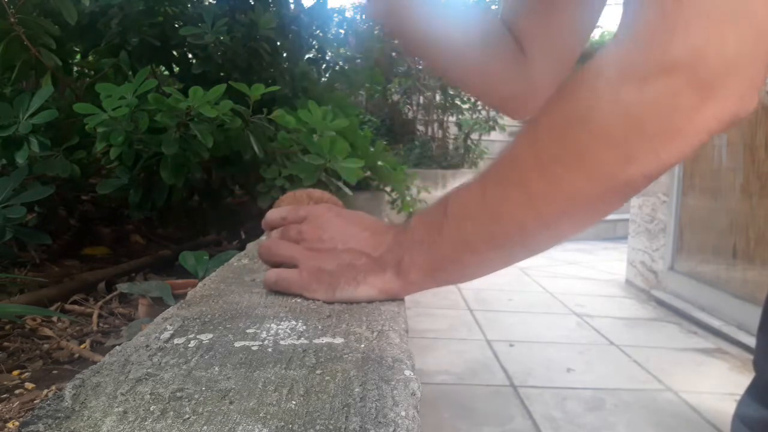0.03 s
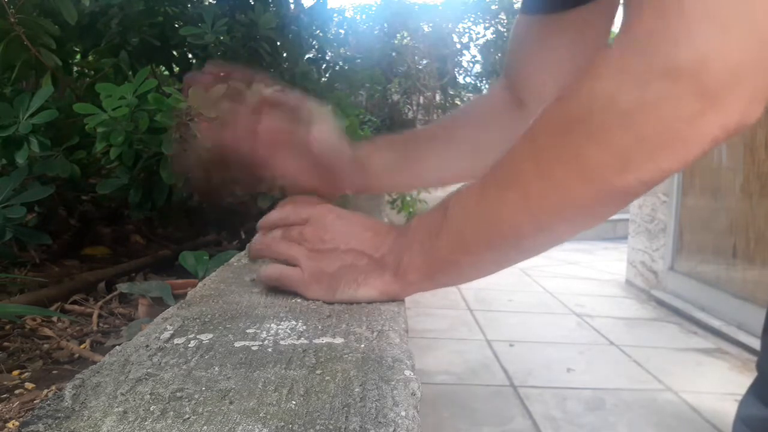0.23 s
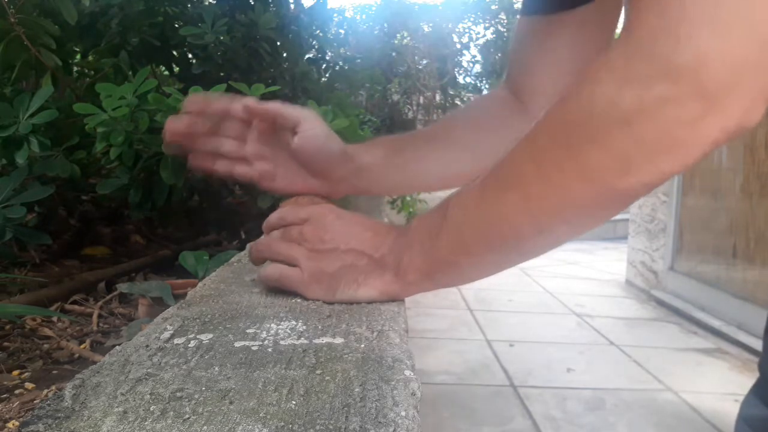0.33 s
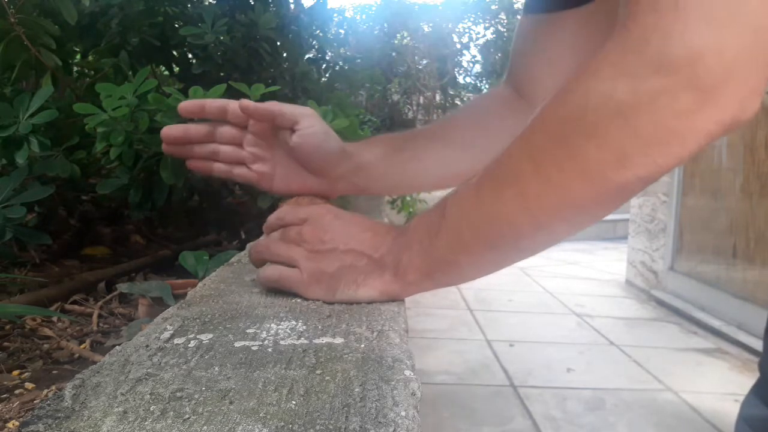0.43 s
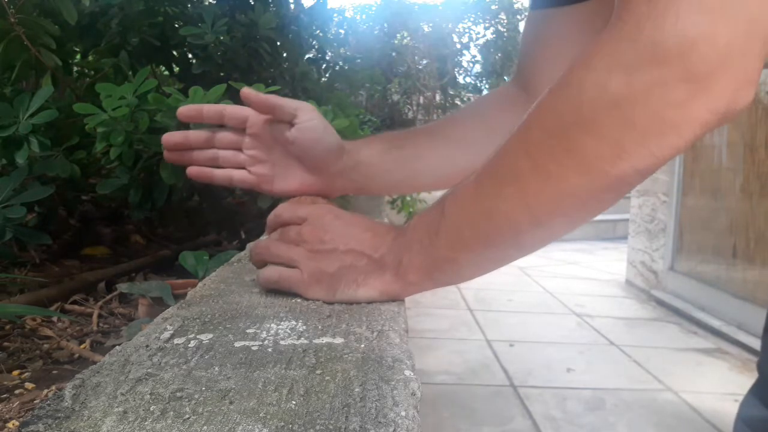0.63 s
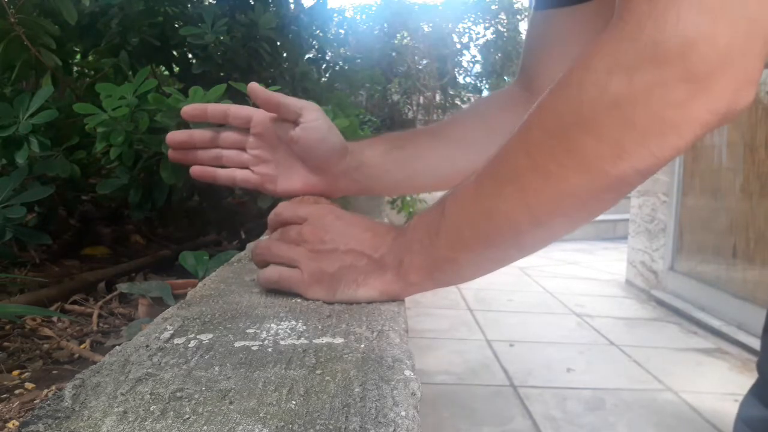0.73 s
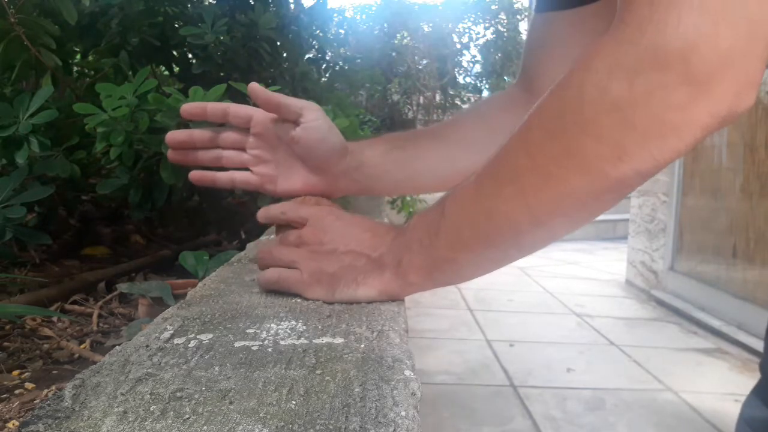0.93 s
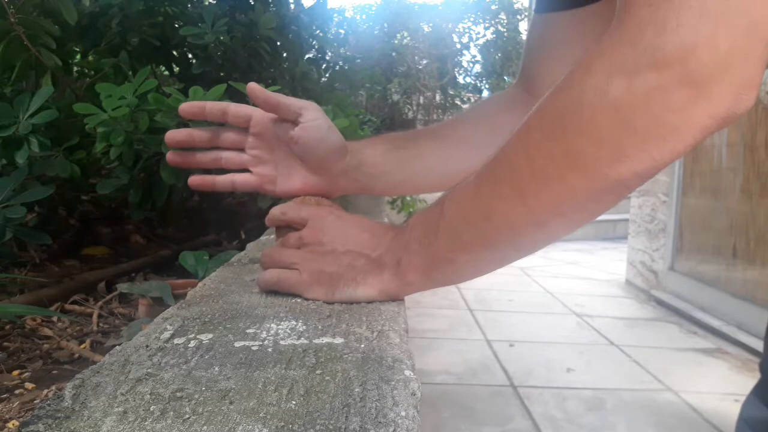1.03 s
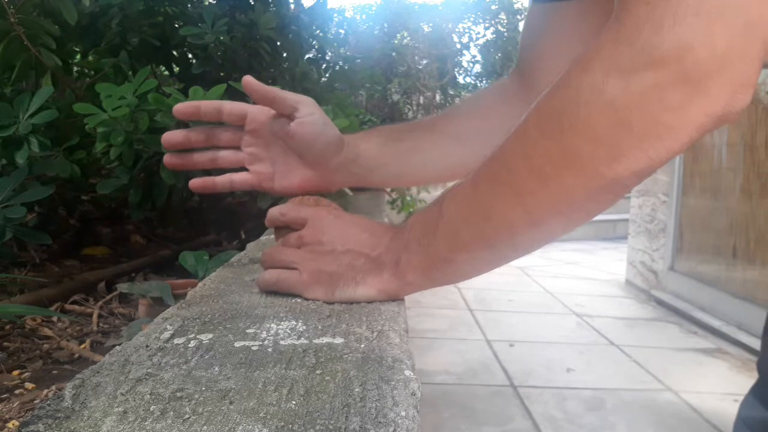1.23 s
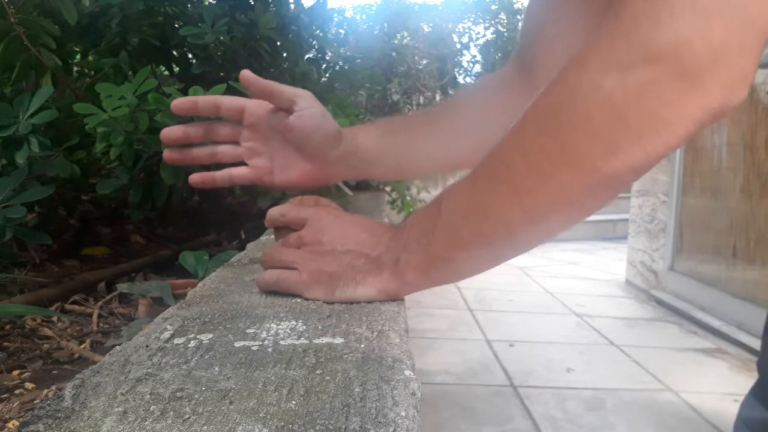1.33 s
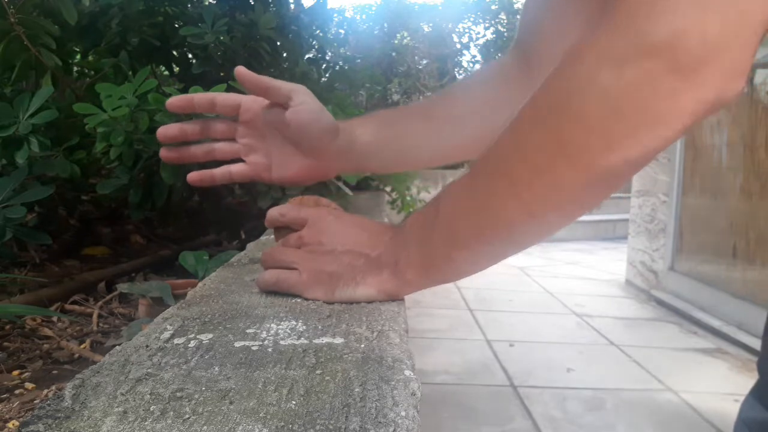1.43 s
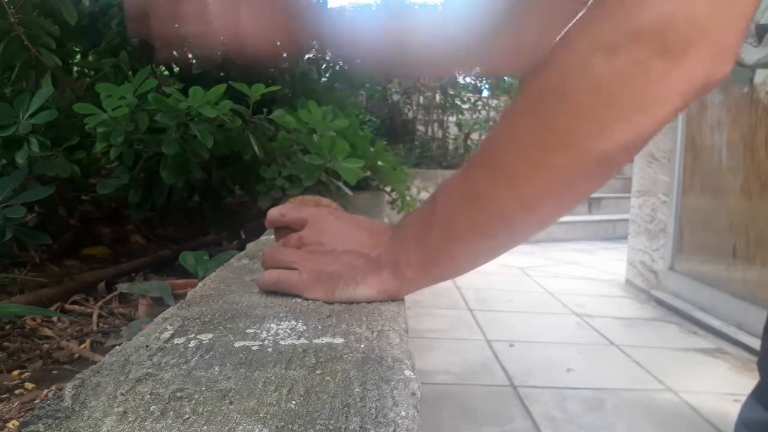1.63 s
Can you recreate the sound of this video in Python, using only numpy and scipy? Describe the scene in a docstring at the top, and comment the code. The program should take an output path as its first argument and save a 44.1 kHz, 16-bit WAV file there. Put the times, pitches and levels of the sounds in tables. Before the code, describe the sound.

One loud hand smack on a stone outdoors, with a short echo, then quiet.

```python
"""A quiet outdoor rumble and hiss come first; then a hand chops once on a stone on a ledge, close by.
A light touch and a sharp crack sound as it lands, and the air pushed by the palm gives a low thud.
The tiles and walls of the yard throw the blow back as a dense clatter, coloured by brief steady tones.
The recorder's gain control turns the sound down for a second, then lets the background swell back,
and a distant hum comes in."""
import sys
import numpy as np
from scipy import signal
from scipy.fft import rfft, irfft
from scipy.io import wavfile
from scipy.ndimage import minimum_filter1d

SR = 44100
rng = np.random.default_rng(int(sys.argv[2]) if len(sys.argv) > 2 else 0)


def dump(signal):
    """Clip the signal to [-1, 1] and save it as 16-bit WAV at the path in sys.argv[1]."""
    limited = np.clip(np.atleast_2d(signal).T, -1, 1)
    pcm = np.round(limited * 32767).astype(np.int16)
    wavfile.write(sys.argv[1], SR, pcm)


N = 74970
T = np.arange(N) / SR
HZ = np.fft.rfftfreq(N, 1 / SR)

# tone colour of the outdoor air: f/Hz, relative level/dB
AIR_COLOUR = [(25, -33), (60, -11.5), (120, -5.5), (200, -3.5), (280, -7), (400, -15), (560, -15),
              (750, -18), (1100, -21), (1650, -26), (2300, -29), (3500, -34.5), (4500, -27), (5300, -31),
              (6200, -38.5), (8600, -41.5), (10000, -56), (15500, -51)]
# faint ticks: t/s, level/dB
FAINT_TICKS = [(0.928, -52), (0.952, -48), (1.1095, -52), (1.218, -44)]
# faint, fine rustles: t/s, level/dB
FAINT_RUSTLES = [(0.04, -68), (0.68, -63), (1.64, -68.5)]
# tone colour of the reflections: f/Hz, relative level/dB
YARD_COLOUR = [(35, -54), (60, -25.5), (123, -7.5), (163, -15), (206, -8.5), (359, -24), (464, -7.5),
               (572, -2), (657, -7), (810, -8), (869, -8), (1120, -3), (1630, -11.5), (1790, -3),
               (2470, -2.5), (3420, -8), (4420, -2.5), (5980, -10.5), (6410, -9), (8470, -7.5),
               (10400, -20.5), (14100, -16.5), (15500, -24)]
# time the reflections take to fade by 60 dB: f/Hz, t/s
YARD_FADE_TIMES = [(100, .36), (400, .26), (1200, .27), (2300, .29), (4300, .275), (8000, .265),
                   (15000, .245)]
# tone colour of the lingering wash of reflections: f/Hz, relative level/dB
WASH_COLOUR = [(100, 2), (200, 4), (350, -1), (1100, -1.5), (1550, -6), (2300, 1.5), (3400, -6.5),
               (4400, -6.5), (7000, -19), (10000, -35), (15000, -42)]
# single strong reflections from nearby surfaces: t/s, level/dB
NEAR_REFLECTIONS = [(0.2315, 2.5), (0.2399, 1), (0.2498, 6), (0.2547, 4), (0.2581, 5)]
# brief steady tones that colour the clatter of reflections: f/Hz, relative level/dB
CLATTER_PEAKS = [(595, -3), (1849, -3), (2091, 0), (2163, 0), (2396, 1), (2540, -2), (2675, -2), (2992, -3),
                 (4009, 1), (4156, -1), (4285, -1), (4394, 0), (4521, 0), (4991, 0)]
# the light touch and the hard hit: t/s, level/dB, decay/s
HAND_CONTACTS = [(0.2162, -17.5, .0014), (0.2216, 9, .0004)]
# tone colour of a contact: f/Hz, relative level/dB
CRACK_COLOUR = [(200, -15.5), (1100, -3.5), (2500, -9), (4300, 2), (5500, -5), (8000, -1.5), (10000, -16),
                (15500, -14.5)]

YARD_START_S, CLICK_RISE_S = .2285, .0005


def amp(db):
    """Turns decibels into a gain."""
    return 10 ** (np.asarray(db) / 20)


def read(points, hz):
    """Looks up a table between its rows, on a log-frequency axis."""
    f, value = np.transpose(points)
    return np.interp(np.log(hz + 1), np.log(f + 1), value)


def noise(gain):
    """Noise of average strength (rms) 1, shaped by a gain at each frequency."""
    x = irfft(gain * np.exp(2j * np.pi * rng.random(len(HZ))), N)
    return x / x.std()


def noise_band(hz, width_hz):
    """Noise that is strongest around one frequency."""
    return noise(1 / (1 + ((HZ - hz) / width_hz) ** 2))


def since(start):
    """Seconds since the start, zero before it."""
    return np.maximum(T - start, 0)


def ramp(start, rise_s):
    """Climbs straight from 0 to 1 and stays there."""
    return np.minimum(since(start) / rise_s, 1)


def burst(start, rise_s, decay_s):
    """A loudness shape that climbs straight up, then dies away."""
    return ramp(start, rise_s) * np.exp(-since(start + rise_s) / decay_s)


def background():
    """Outdoor rumble, a thin hiss like far insects, a wavering distant hum, faint ticks and rustles."""
    low_cut = HZ ** 2 / np.hypot(HZ ** 2, 38 ** 2)  # weakens the rumble below 38 Hz
    air = amp(-41) * noise(amp(read(AIR_COLOUR, HZ)) * low_cut)
    hiss = amp(-62) * noise_band(hz=4490, width_hz=200)
    hum_hz = 550.2 + 4.125 * noise_band(hz=0, width_hz=7.3)  # the pitch wanders a little
    hum = amp(-47) * ramp(1.282, rise_s=.0354) * np.sin(2 * np.pi * np.cumsum(hum_hz) / SR)
    tick_shape = sum(amp(db) * burst(t, CLICK_RISE_S, decay_s=.001407) for t, db in FAINT_TICKS)
    ticks = tick_shape * noise_band(hz=8300, width_hz=1460)
    rustle_shape = sum(amp(db) * burst(t, rise_s=.0082, decay_s=.025) for t, db in FAINT_RUSTLES)
    rustles = rustle_shape * noise_band(hz=13030, width_hz=2460)
    return air + hiss + hum + ticks + rustles


def yard_reflections():
    """Reflections from tiles and walls pile up and fade; a few stand out, and one far echo follows."""
    swell_s, swell_db, wash_fade_s = .02743, 1.5, .82
    colour = amp(read(YARD_COLOUR, HZ))
    spectrum = rfft(noise(colour))
    age = since(YARD_START_S + swell_s)
    centres_hz = np.geomspace(60, 16000, 14)
    clatter = np.zeros(N)
    for hz, this_band_only in zip(centres_hz, np.eye(len(centres_hz))):
        band = irfft(spectrum * read(np.c_[centres_hz, this_band_only], HZ), N)
        clatter += band * amp(-60 * age / read(YARD_FADE_TIMES, hz))  # each band fades at its own pace
    swell = amp(swell_db * (ramp(YARD_START_S, swell_s) - 2))
    build_up = ramp(YARD_START_S, rise_s=.0026) * swell
    wash = amp(-13.5 - 60 * age / wash_fade_s) * noise(amp(read(WASH_COLOUR, HZ)))
    slap_shape = sum(amp(db) * burst(t, rise_s=.0004, decay_s=.0013) for t, db in NEAR_REFLECTIONS)
    slaps = slap_shape * noise(colour)
    echo = amp(-25) * burst(.464, rise_s=.006, decay_s=.015) * noise_band(hz=2080, width_hz=420)
    return build_up * (amp(5) * clatter + wash) + slaps + echo


def clatter_peaks():
    """Brief steady tones that colour the clatter of reflections and fade with it."""
    tones = sum(amp(db) * np.sin(2 * np.pi * (hz * T + rng.random())) for hz, db in CLATTER_PEAKS)
    decay_s = .26 / np.log(1000)  # fades by 60 dB in 0.26 s
    return amp(-11) * burst(YARD_START_S, rise_s=.021, decay_s=decay_s) * tones


def hand_chop():
    """The hand cracks and knocks on the stone, pushes out a puff of air and lands with its weight."""
    crack_shape = np.zeros(N)
    for t, db, decay_s in HAND_CONTACTS:
        tail = amp(-29.5) * burst(t, CLICK_RISE_S, decay_s=.011)
        crack_shape += amp(db) * (burst(t, CLICK_RISE_S, decay_s) + tail)
    cracks = crack_shape * noise(amp(read(CRACK_COLOUR, HZ)))
    # the edge of the hand meets the stone with a dull knock
    knock_start, knock_hz = .2203, 950
    knock_tone = np.sin(2 * np.pi * knock_hz * since(knock_start))
    knock = amp(-6) * burst(knock_start, CLICK_RISE_S, decay_s=.00033) * knock_tone
    # air pushed by the palm: the pressure swings one way, then the other
    thud_start, thud_decay_s = .2219, .0012
    swing = 1 - since(thud_start) / thud_decay_s
    thud = amp(18.5) * burst(thud_start, rise_s=.00044, decay_s=thud_decay_s) * swing
    # the weight of the arm follows as one soft, deep bump
    bump_start, bump_length_s = .2275, .0125
    bump = amp(-3) * np.sin(np.pi * ramp(bump_start, bump_length_s))
    return cracks - knock - thud - bump


def scene():
    """The chop, its clatter of reflections and the background, in one channel."""
    return (hand_chop() + yard_reflections() + clatter_peaks() + background())[None]


def record(dry):
    """The gain drops at once, holds and recovers; peaks are rounded off and the highest treble is cut."""
    max_cut_db, hold_s, recover_db_per_s = 14.5, 1.0355, 53
    ceiling, treble_edge_hz = .88, 15850
    level_db = 20 * np.log10(abs(dry[0]) + 1e-9)
    cut_db = np.clip(3 * level_db, 0, max_cut_db)  # only peaks above 0 dB turn the gain down
    half = int(hold_s * SR / 2)
    # keep the deepest cut of the last hold_s seconds
    held_db = -minimum_filter1d(-cut_db, 2 * half + 1, origin=half, mode="constant")
    recovery_db = T * recover_db_per_s
    ducked = dry / amp(np.maximum.accumulate(held_db + recovery_db) - recovery_db)
    rounded = ducked / (1 + (ducked / ceiling) ** 8) ** (1 / 8)
    treble_cut = signal.firwin(511, treble_edge_hz, window=("kaiser", 9), fs=SR)
    return signal.oaconvolve(rounded, treble_cut[None], "same")


dry = scene()
out = record(dry)
dump(out)
```